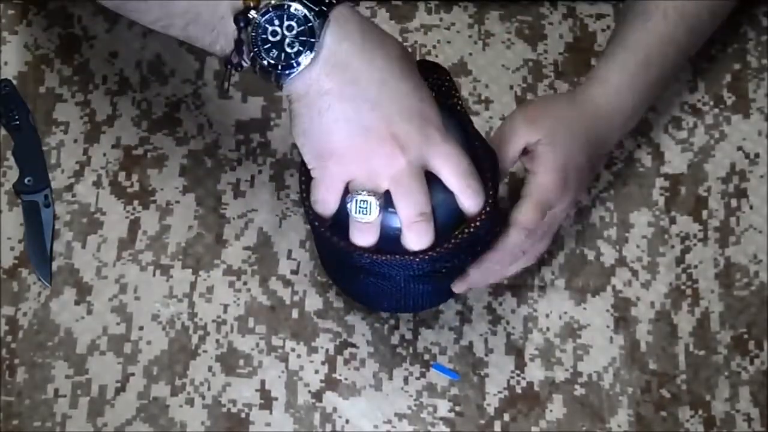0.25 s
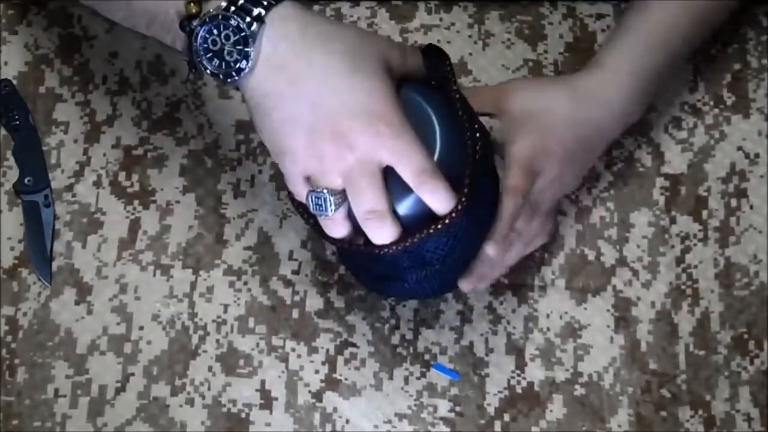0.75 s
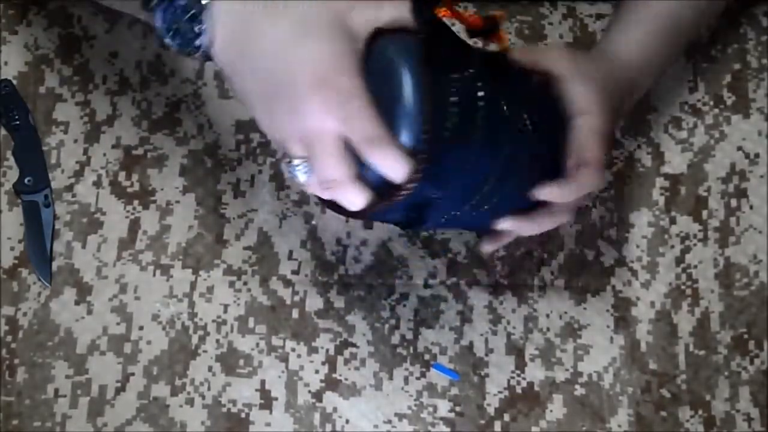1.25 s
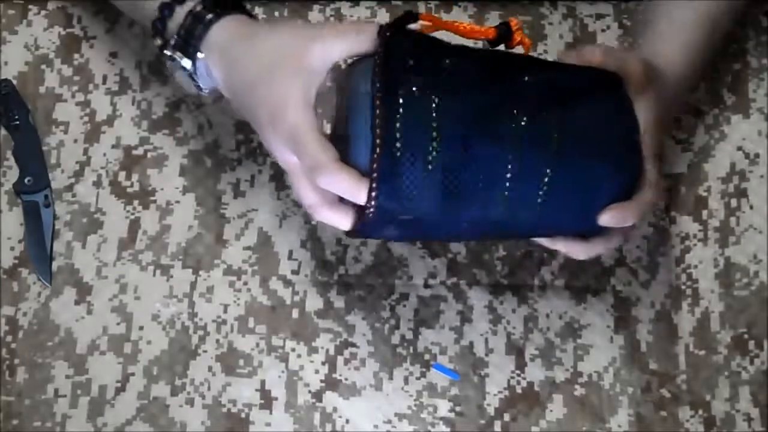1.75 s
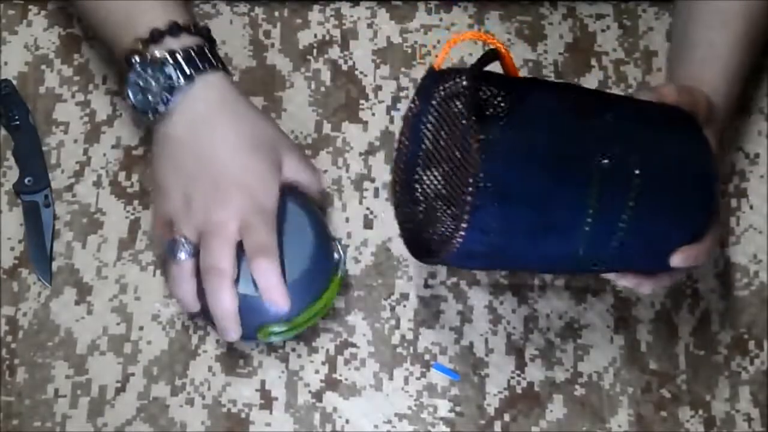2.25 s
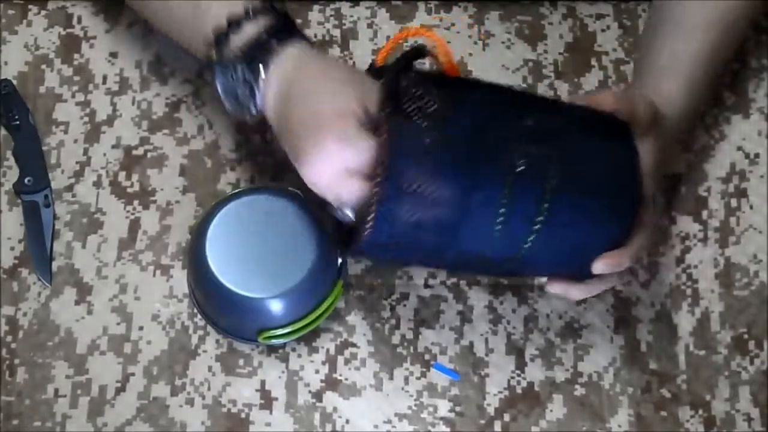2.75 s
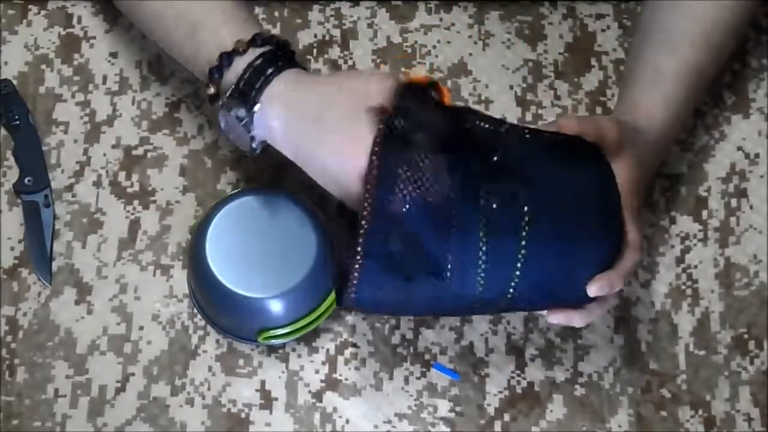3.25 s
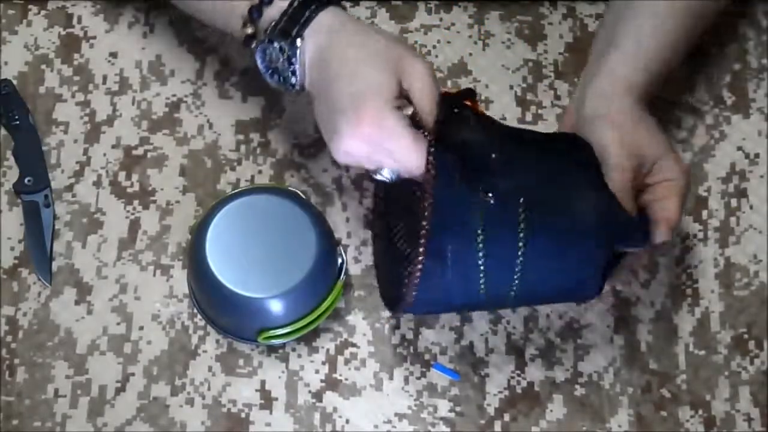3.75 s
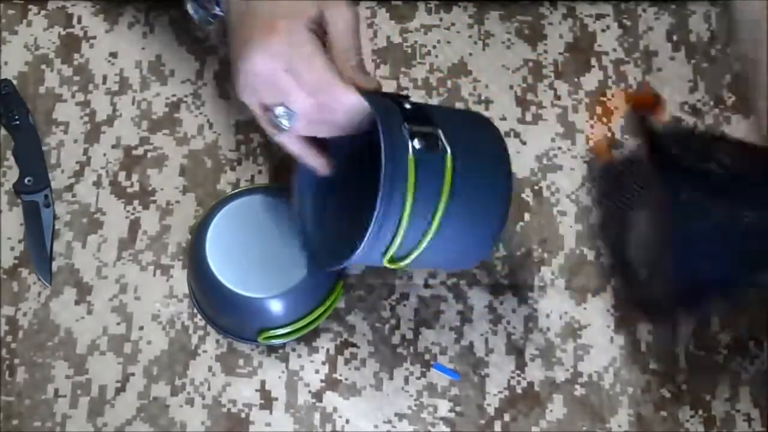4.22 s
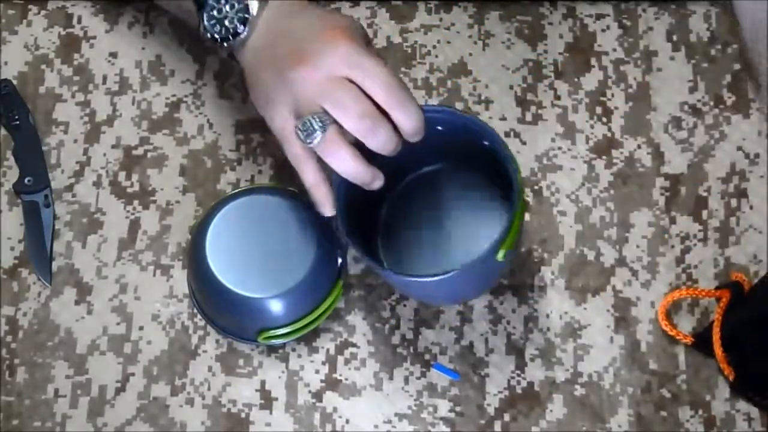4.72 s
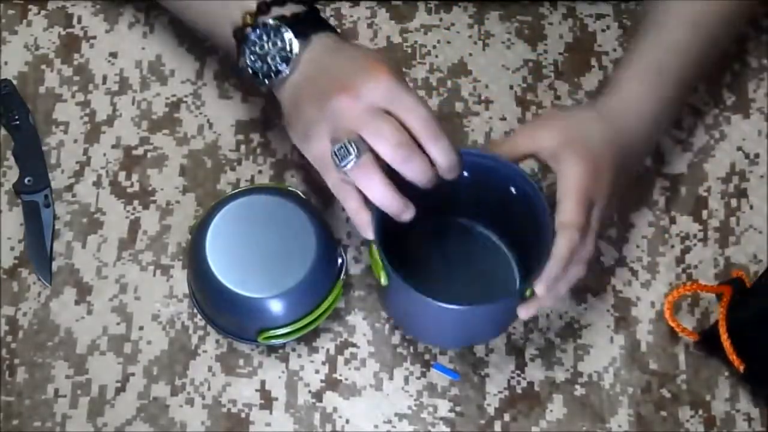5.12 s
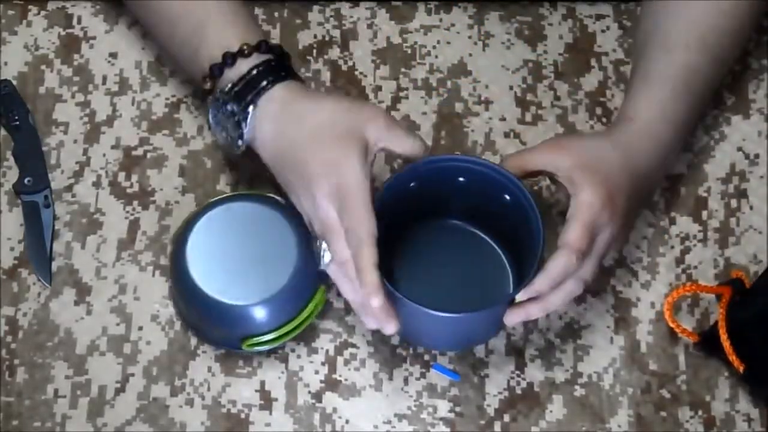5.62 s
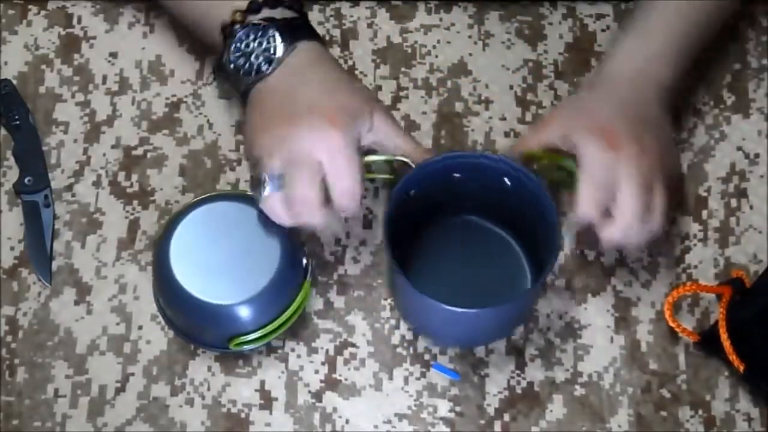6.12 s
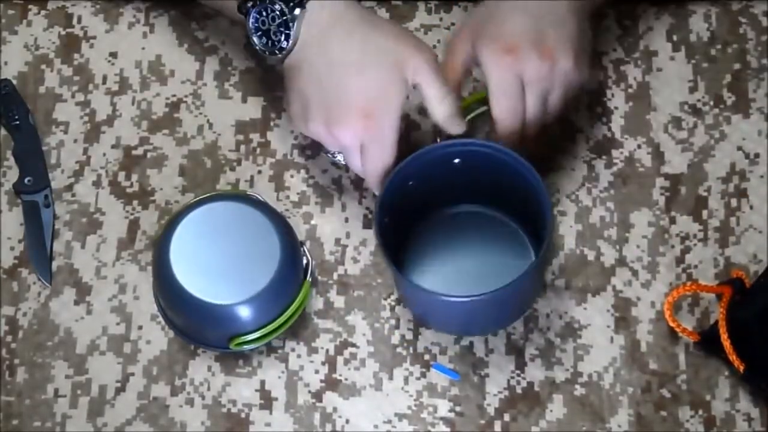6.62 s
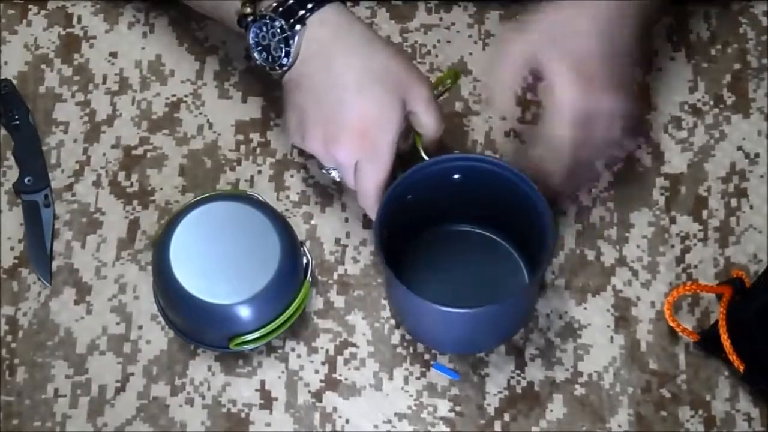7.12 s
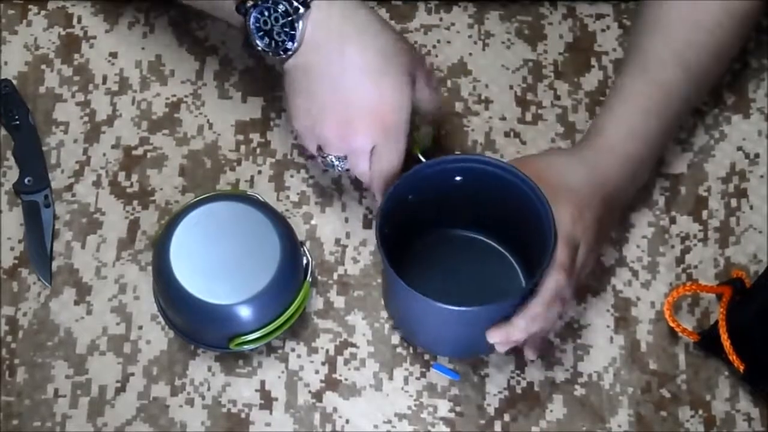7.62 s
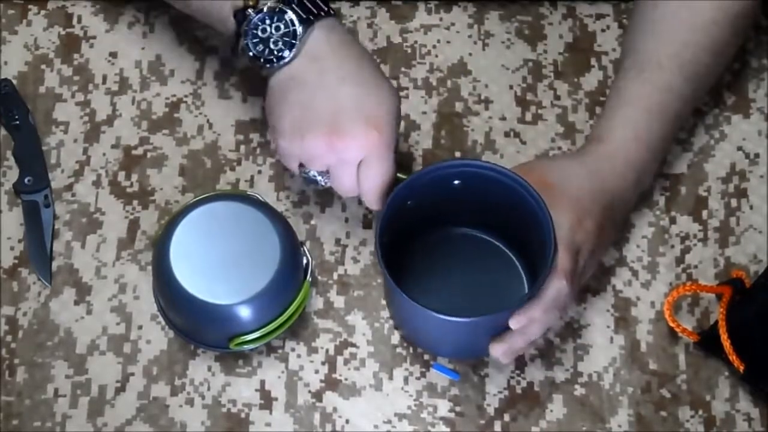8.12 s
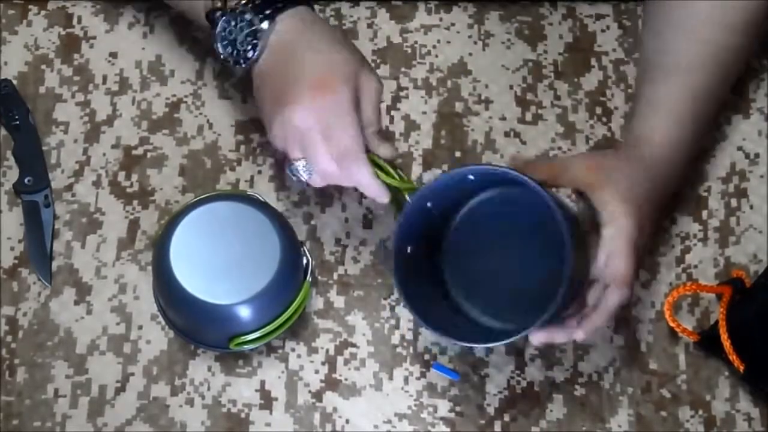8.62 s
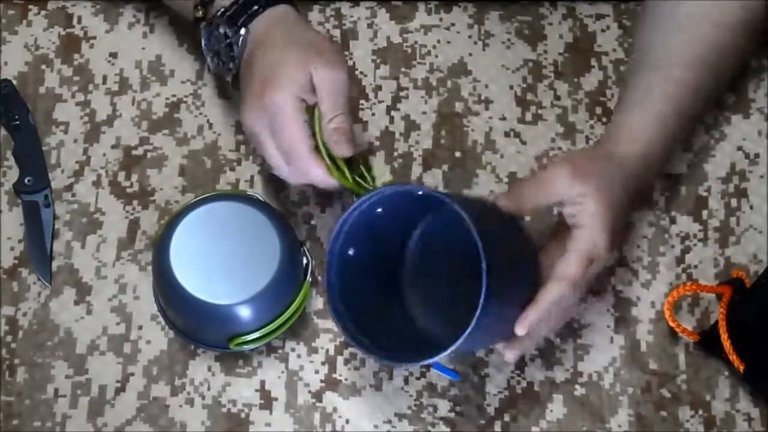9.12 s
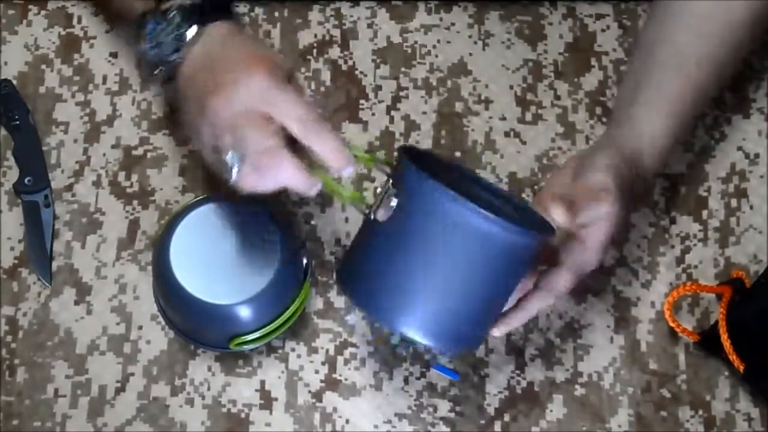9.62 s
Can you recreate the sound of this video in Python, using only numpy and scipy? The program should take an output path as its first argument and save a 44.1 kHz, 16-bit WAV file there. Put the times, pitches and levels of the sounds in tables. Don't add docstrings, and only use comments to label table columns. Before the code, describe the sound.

In a small quiet room with faint hum, a light metal bowl shifts in a mesh bag, then knocks brightly against its pot as it is pulled out. It lands on a cloth-covered table with a thud and clink. Mesh slides off the pot, which lands with a firmer thud. Its wire handle rattles open, followed by scrapes and little ticks. One microphone above, close.

```python
import sys
import numpy as np
from scipy import signal
from scipy.fft import rfft, irfft
from scipy.io import wavfile
from scipy.ndimage import uniform_filter1d

SR = 44100
rng = np.random.default_rng(int(sys.argv[2]) if len(sys.argv) > 2 else 0)


def transcribe(signal):
    frames = np.atleast_2d(signal).T
    limited = np.clip(frames, -1, 1)
    pcm = np.round(limited * 32767).astype(np.int16)
    wavfile.write(sys.argv[1], SR, pcm)


def voltage_ratio(level):
    return 10 ** (np.asarray(level, float) / 20)


N = 434826

# f/Hz, level/dB (per Hz)
CRACK = [(280, -25.5), (480, 5), (1030, -4), (3970, 1), (5810, -6.5), (6630, -1.5), (14000, -10),
         (16000, -14)]
# f/Hz, level/dB (per Hz)
SCUFF = [(240, -28), (400, -2), (1710, -6.5), (2320, -15), (2630, -12), (7280, -13.5), (16000, -22.5)]
# f/Hz, level/dB, time to fall by 60 dB t60/s
CAVITY = [(594, -8, 0.12), (697, -6, 0.13), (1415, -23, 0.074)]
# f/Hz, level/dB, t60/s
UNDER_POT = [(65, 1.5, 0.22), (106, 1.5, 0.058), (158.5, -10.5, 0.37), (204, 5, 0.11), (290.4, 6.5, 0.1),
             (359.4, -11, 0.29), (482, -0.5, 0.063), (568, -19, 0.47), (745, -10, 0.12), (966, -10, 0.054)]


def evened(x):
    return x / np.sqrt(np.mean(x ** 2) + 1e-20)


def read(points, hz):
    f, value = np.transpose(points)
    return np.interp(np.log(hz + 1), np.log(f + 1), value)


def coloured(x, points):
    hz = np.fft.rfftfreq(len(x), 1 / SR)
    return irfft(rfft(x) * voltage_ratio(read(points, hz)), len(x))


def filtered(x, order, hz, kind):
    return signal.sosfilt(signal.butter(order, hz, kind, fs=SR, output="sos"), x)


def add(mix, s, sound):
    part = mix[round(s * SR):][:len(sound)]
    part += sound[:len(part)]


def ring(modes, grip, tilt_db=0, spot_db=0, pair=0):
    hz, db, t60 = np.transpose(modes)[:, :, None]
    t = np.arange(12000) / SR
    sign = (-1) ** np.arange(len(modes))[:, None]
    t60 = np.minimum(t60, 0.35) * max(grip, 0.1)
    swing = np.sin(2 * np.pi * hz * t)
    swing = swing + 0.54 * np.sin(2 * np.pi * hz * (1 + pair) * t) * np.any(pair)
    level_db = db + spot_db + tilt_db * np.log2(hz / 1500) - 60 * t / t60
    return (sign * voltage_ratio(level_db) * swing).sum(0)


def dense(points, t60):
    t = np.arange(12000) / SR
    noise = evened(coloured(rng.standard_normal(len(t)), points))
    return evened(noise * voltage_ratio(-60 * t / t60) * (1 - np.exp(-t / 0.00026)))


def grit(size, spread_db):
    strength = np.minimum(rng.exponential(1, size), 5)
    return evened(rng.standard_normal(size) * voltage_ratio(spread_db * strength))


def rings_of(x, peaks):
    total = 0
    for hz, width, db in peaks:
        total = total + voltage_ratio(db) * signal.lfilter(*signal.iirpeak(hz, hz / max(width, 5), SR), x)
    return evened(total)


def metal(hits, modes, upper, crack_db, spot_db, usual_db, rise_ms, rattle_ms):
    out, t = np.zeros(N), np.arange(8000) / SR
    rise = np.minimum(t / (max(rise_ms, 0.2) / 1000), 1) ** 1.2
    swell = rise * np.exp(-t / (max(rattle_ms, 1) / 1000))
    first = (t == 0) / max(rise_ms, 1)
    for s, db, treble_db, grip in hits:
        tilt_db = np.clip((treble_db - usual_db) / 2, -9, 6)
        rattle = swell * grit(len(t), spread_db=3.0)
        spot, split = rng.standard_normal((2, len(modes), 1))
        clear = ring(modes, grip, tilt_db, spot_db * spot, 0.0088 * split)
        tilted_upper = [(f, g + tilt_db * np.log2(f / 1500)) for f, g in upper]
        crack = dense(tilted_upper, t60=0.06)
        sound = signal.fftconvolve(rattle + 44.7 * first, evened(clear))
        sound += voltage_ratio(crack_db) * signal.fftconvolve(rattle + 10.0 * first, crack)
        add(out, s, voltage_ratio(db) * sound / abs(sound).max())
    return out


def bowl_in_pot():
    # f/Hz, level/dB, t60/s
    upright = [(767, -10.5, 0.46), (1410, -5.5, 1.1), (2092, 8, 0.14), (2910, -3, 0.26), (3340, 2, 0.16),
               (3950, -3, 0.36), (4430, 8, 0.056), (6500, -5, 0.24), (8550, -7, 0.14), (8990, -9, 0.14)]
    seated = [(536, -14, .15), (664, -2.5, 0.23), (1050, -2, 0.12), (1360, -14, .15), (1850, 0.5, .11),
              (1940, 1, 0.12), (2090, -7, .3), (3030, -3, .09), (3360, -3, .13), (4140, -4, 0.1),
              (5330, -6, .11), (6700, -10, .15), (8300, -19, .12)]
    tilted = [(434, -6, 0.31), (700, -7.5, .4), (1045, -11, 0.4), (1389, -11, 0.56), (1670, -13, .28),
              (1860, -11, 0.3), (2170, -10, .25), (3068, -18, .3), (3951, -4.5, .5), (5370, -14, .33),
              (6800, -25, .3)]
    loose = [(686, 1, 0.35), (1026, 5.5, 0.26), (1384, -13, 0.52), (1740, -3, .16), (2197, 4, 0.15),
             (2800, -3, .22), (3025, -8, .13), (3640, 7, 0.14), (4066, 12.5, 0.2), (4580, -12, .24),
             (5082, 8.5, 0.18), (6659, -13, .2), (8750, -22, .2)]
    freed = [(475, -9, 0.23), (676, -3, 0.082), (1063, -8, 0.18), (1387, -14, .5), (1910, -3, 0.11),
             (2090, -11, 0.22), (2428, -8, .22), (3260, -7, .1), (3941, -3, 0.18), (4550, -15, .16),
             (7300, -23, .1), (8624, -16, .2)]
    # t/s, peak level/dB, treble minus peak level/dB, grip (factor on the ring time)
    upright_hits = [
        (0.542, -53, -2, 0.9),
        (0.56, -37.5, -5, 0.47),
        (0.772, -29.5, -8.5, 0.55),
    ]
    seated_hits = [
        (1.367, -20.5, -5, 0.58),
        (1.371, -22, -20.5, 0.78),
    ]
    tilted_hits = [
        (1.496, -19, -8, 0.22),
        (1.539, -27.5, -6, 1),
    ]
    loose_hits = [
        (1.667, -12.5, -6.5, 0.32),
        (1.676, -25.5, -10, 0.41),
        (1.699, -38, -10, 0.55),
        (3.358, -47, 3, 0.37),
    ]
    freed_hits = [
        (1.854, -29, -10, 1),
        (1.874, -28.5, -10.5, 0.9),
    ]
    # knocks, ring, crack level/dB, rise/ms, rattle/ms
    stages = [(upright_hits, upright, 1.9, 4.5, 19), (seated_hits, seated, 1.8, 8, 13),
              (tilted_hits, tilted, 3.5, 5.5, 25), (loose_hits, loose, 3.0, 5.5, 14.5),
              (freed_hits, freed, 1.5, 14, 17.5)]
    out = np.zeros(N)
    for hits, modes, crack_db, rise_ms, rattle_ms in stages:
        out += metal(hits, modes, CRACK, crack_db, 1.0, -3.5, rise_ms, rattle_ms)
    return filtered(out, 2, 330, "highpass")


def free_bowl():
    # f/Hz, level/dB, t60/s
    lifted = [(294, 0, 0.085), (455, -2, 0.15), (624, 0.5, 0.11), (1025, -1, 0.064), (2113, -7, 0.32),
              (7800, -31, .1)]
    lying = [(430, 5.5, 0.085), (1068, 13.5, 0.071), (1950, -2, .24), (2160, -8, .4), (3470, -29, 0.15),
             (4170, -16, 0.23), (5276, -7.5, .4), (7321, -32, 0.25)]
    # t/s, peak level/dB, treble minus peak level/dB, grip (factor on the ring time)
    lifted_hits = [
        (2.043, -42, -12, 0.78),
        (2.057, -45, -1, 0.69),
    ]
    lying_hits = [
        (0.559, -49.5, -7, 0.51),
        (2.469, -27, -28, 0.35),
        (2.494, -34, -1, 0.53),
        (2.503, -24, -3.5, 0.3),
    ]
    out = metal(lifted_hits, lifted, CRACK, -9.5, 1.7, -17.0, rise_ms=3.9, rattle_ms=21)
    return out + metal(lying_hits, lying, CRACK, -10.0, 1.0, -10.5, rise_ms=2.56, rattle_ms=19)


def pot():
    # f/Hz, level/dB, t60/s
    pot_modes = [(233.8, 15.5, 0.18), (473, 0.5, 0.082), (662, 4, 0.22), (1368, -3.5, 0.14),
                 (1890, -3, 0.13), (2627, -3.5, 0.17), (3625, -2, .1), (5200, -26, .06)]
    # t/s, peak level/dB, treble minus peak level/dB, grip (factor on the ring time)
    pot_hits = [(4.627, -35.5, -31, 0.66), (5.953, -38.5, -17, 1), (6.356, -44, -13, 0.64),
                (6.448, -48, -1, 0.61), (6.588, -39, -7, 0.99), (6.673, -42.5, -8, 0.4),
                (6.817, -42, -1, 0.51), (6.969, -50, -1, 0.57), (7.522, -49.5, -8, 0.57),
                (7.739, -42.5, -8, 0.48), (7.831, -31.5, -7, 0.85), (7.872, -31, -13.5, 0.24),
                (7.929, -44, -11, 0.98), (9.414, -52.5, -16, 1), (9.482, -48.5, -28, 0.38)]
    # t/s, peak level/dB
    taps = [(4.15, -50.5), (4.784, -54.5), (4.923, -54), (4.968, -53.5), (5.207, -50.5), (6.623, -44.5),
            (6.981, -44), (8.312, -49.5), (8.517, -54), (8.559, -48.5), (8.816, -41)]
    soft_hits = [(s, db, -30, 0.75) for s, db in taps]
    out = metal(pot_hits, pot_modes, SCUFF, -0.76, 5.6, -8.5, rise_ms=1.7, rattle_ms=16)
    return out + metal(soft_hits, CAVITY, SCUFF, -5.0, 1.5, -34.0, rise_ms=1.9, rattle_ms=13.4)


def handle():
    # f/Hz, level/dB, t60/s
    wire = [(936, 2.5, 0.083), (1028, 8, 0.052), (1577, -9, 0.084), (2130, -5.5, 0.1), (3573, -18.5, 0.48),
            (4167, -13.5, 0.22), (5281, -16, 0.25), (7380, -23, .3), (10960, -21, 0.33)]
    # t/s, peak level/dB, treble minus peak level/dB, grip (factor on the ring time)
    wire_hits = [
        (0.505, -48, -31, 0.4),
        (5.99, -29, -4, 0.63),
        (6.015, -33, -20, 0.29),
        (6.039, -39.5, -11.5, 0.78),
        (6.06, -31.5, -13.5, 0.95),
        (6.095, -32, -15.5, 0.52),
        (6.124, -36, -17, 0.2),
        (6.149, -55, 4, 0.95),
    ]
    return metal(wire_hits, wire, SCUFF, -8.0, 2.3, -9.0, rise_ms=2.7, rattle_ms=24.0)


def push(pushes, modes, wood_db, contact_ms):
    # f/Hz, level/dB (per Hz)
    wood = [(300, -25), (500, 4), (690, -0.5), (1050, -6), (1500, -22.5), (2200, -21), (5000, -28),
            (11000, -70)]
    out = np.zeros(N)
    u = np.arange(600) / SR / (max(contact_ms, 0.05) / 1000)
    for s, db, grip in pushes:
        sound = evened(signal.fftconvolve(u * np.exp(-u), ring(modes, grip)))
        front = signal.fftconvolve(np.exp(-3.5 * u), dense(wood, 0.12 * grip))
        sound += voltage_ratio(wood_db) * evened(front)
        add(out, s, voltage_ratio(db) * sound / abs(sound).max())
    return out


def table_top():
    # f/Hz, level/dB, t60/s
    under_bowl = [(114.8, -11.5, 0.9), (150, -9.5, 0.59), (210, 1, 0.1), (237.3, 1.5, 0.22),
                  (280.8, 1, 0.15), (353, -6, 0.055), (452, -15, 0.29), (650, -22, 0.4), (840, -15, 0.088),
                  (932, -6, 0.12)]
    under_hand = [(51, 7.5, 0.17), (68.6, 6.5, 0.12), (107.8, -2, 0.68), (165, -9, 0.12), (242, -5, 0.06)]
    # t/s, peak level/dB, grip (factor on the ring time)
    bowl_pushes = [
        (0.755, -43, 0.55),
        (1.241, -51.5, 0.9),
        (1.666, -38.5, 0.98),
        (2.468, -15, 0.85),
        (2.496, -20, 0.1),
        (2.505, -19.5, 0.19),
        (4.579, -47, 0.64),
        (4.615, -38, 0.39),
        (4.627, -34.5, 0.95),
        (7.043, -45, 0.95),
    ]
    pot_pushes = [
        (5.352, -12, 0.57),
        (5.373, -14.5, 0.27),
        (5.388, -25, 0.49),
        (5.955, -32, 0.95),
        (6.328, -42, 0.58),
        (6.574, -43, 1),
        (7.86, -48, 0.81),
    ]
    hand_pushes = [
        (0.049, -47, 0.23),
        (0.781, -46.5, 0.87),
        (5.079, -54, 0.8),
        (5.534, -37, 1),
        (5.814, -35, 0.65),
        (5.988, -32, 0.43),
        (7.151, -49, 0.73),
        (7.487, -32, 0.47),
        (7.509, -36.5, 0.33),
        (7.629, -48, 0.8),
    ]
    out = push(bowl_pushes, under_bowl, -12.0, contact_ms=0.28)
    out += push(pot_pushes, UNDER_POT, -16.0, contact_ms=0.65)
    return out + push(hand_pushes, under_hand, -29.5, contact_ms=0.33)


def rub(strokes, mix_db, ringing, skew):
    # f/Hz, level/dB (per Hz)
    fizz_colour = [(1760, -46), (3000, -44), (4030, 1.5), (5600, -2), (6600, 4), (14800, -2.5), (16000, -6)]
    # f/Hz, width/Hz, level/dB
    fizz_peaks = [(2350, 21, -7.5), (3970, 30, 10), (4700, 54, 10), (5220, 20, 10), (6480, 70, -3),
                  (8760, 45, -10), (10300, 64, -5), (12500, 60, -7)]
    wall_peaks = [(455, 38, 7.5), (1180, 44, -4), (1405, 15, 7), (1636, 35, -7), (1950, 120, -2.5),
                  (2650, 68, -4), (3440, 160, -5), (5370, 65, -13)]
    bands_hz = np.arange(1600, 16400, 400)

    def shifted(peaks):
        return [(hz * rng.uniform(0.98, 1.02), w, db + 4 * rng.standard_normal()) for hz, w, db in peaks]

    out = np.zeros(N)
    for s, length, slip_db, press_db in strokes:
        levels_db = np.add(mix_db, [slip_db, slip_db, press_db, press_db])
        size = min(round(length * SR), 20000)
        waver = evened(uniform_filter1d(rng.standard_normal(20000), 700))
        slip = grit(20000, spread_db=1.5) * voltage_ratio(0.74 * waver)
        stroke_shape = np.sin(np.pi * np.linspace(0, 1, size) ** skew)
        slip = np.pad(slip[:size] * stroke_shape, (0, 4096))
        bands = [(hz, db + 3.5 * rng.standard_normal()) for hz, db in zip(bands_hz, read(fizz_colour, bands_hz))]
        fizz = evened(coloured(slip, bands)) + ringing * rings_of(slip, shifted(fizz_peaks))
        wall = 1.75 * evened(filtered(slip, 2, [1000, 3600], "bandpass"))
        wall += rings_of(slip, shifted(wall_peaks))
        cavity = signal.fftconvolve(slip, ring(CAVITY, 0.58))[:len(slip)]
        rumble = signal.fftconvolve(slip, ring(UNDER_POT, 0.58))[:len(slip)]
        parts = zip(levels_db, (fizz, wall, cavity, rumble))
        longer = np.sqrt(len(slip) / size)
        add(out, s, longer * sum(voltage_ratio(db) * evened(x) for db, x in parts))
    return out


def rubbing():
    # t/s, length/s, slip level/dB, pressure level/dB
    slides = [(2.029, 0.17, -75, -72), (3.235, 0.08, -92, -77), (3.355, 0.04, -68, -82),
              (3.607, 0.072, -71, -79), (3.701, 0.35, -67, -72.5), (3.93, 0.46, -67, -70),
              (5.116, 0.33, -78, -73.5), (5.344, 0.036, -77.5, -61), (8.565, 0.061, -76.5, -81),
              (9.688, .19, -66.5, -80)]
    brushes = [(5.872, 0.22, -66, -63), (6.251, 0.22, -69.5, -62), (6.41, 0.28, -61.5, -61.5),
               (7.587, 0.097, -70, -71), (8.303, .18, -72.5, -75), (8.8, .21, -70.5, -83),
               (9.249, 0.29, -76.5, -88)]
    scrapes = [(.479, 0.22, -70, -67.5), (.953, 0.15, -81, -75.5), (2.622, 0.34, -77.5, -79),
               (6.074, 0.13, -67, -67), (6.602, 0.31, -70.5, -63), (6.768, 0.21, -60, -61.5),
               (6.888, .22, -60.5, -65), (7.049, 0.22, -77.5, -75), (7.511, 0.058, -70.5, -76),
               (7.726, 0.2, -69, -69), (7.875, 0.1, -80, -60)]
    # fizz/dB and wall/dB over slip, cavity/dB and table/dB over pressure
    slide_mix = (0.5, -11, 0.5, -25)
    brush_mix = (1.5, -5, -16.5, -2.5)
    scrape_mix = (-3, 0, -8.5, -5)
    out = rub(slides, slide_mix, ringing=0.35, skew=0.6)
    out += rub(brushes, brush_mix, ringing=0.36, skew=0.7)
    return out + rub(scrapes, scrape_mix, ringing=0.32, skew=0.8)


def room(x):
    # f/Hz, t60/s
    echo_times = [(100, 0.19), (500, 0.3), (2000, 0.33), (8000, 0.31), (16000, 0.29)]
    taps = np.zeros(SR // 2)
    at = np.arange(200, len(taps) - 20, 20)
    taps[at + rng.integers(0, 20, len(at))] = rng.choice([-1., 1.], len(at))
    hz, t, z = signal.stft(taps, SR, nperseg=256)
    t60 = np.maximum(read(echo_times, hz), 0.03)[:, None]
    tail = signal.istft(z * voltage_ratio(-60 * t / t60), SR, nperseg=256)[1]
    return signal.fftconvolve(x, tail / np.linalg.norm(tail))[:N]


def air():
    # f/Hz, level/dB (per Hz)
    hiss = [(8.8, -43.5), (15, -11.5), (45, -5.5), (142, -12), (628, -20.5), (1790, -26), (5500, -31),
            (16000, -34.5)]
    # f/Hz, level/dB (rms)
    hum = [(29, -66.5), (48.4, -63), (91.5, -71.5), (178, -75), (350, -77)]
    t = np.arange(N) / SR
    out = voltage_ratio(-61.0) * evened(coloured(rng.standard_normal(N), hiss))
    for hz, db in hum:
        slow = uniform_filter1d(uniform_filter1d(rng.standard_normal(N), 5000), 5000)
        waver = evened(slow)
        out += voltage_ratio(db + 2 + 1.7 * waver) * np.sin(2 * np.pi * hz * t + 0.51 * waver[::-1])
    return out


def scene():
    near = bowl_in_pot() + free_bowl() + pot() + handle() + table_top() + rubbing()
    near = filtered(near, 2, 45, "highpass")
    return (near + voltage_ratio(-10.0) * room(near) + air())[None]


def band_limit(x):
    return signal.sosfilt(signal.butter(12, 16310, fs=SR, output="sos"), x)


def record(dry):
    lowpass = signal.firwin(1023, 15850, window=("kaiser", 9), fs=SR)
    limited = signal.oaconvolve(dry, lowpass[None], "same")
    return band_limit(limited)


dry = scene()
out = record(dry)
transcribe(out)
```